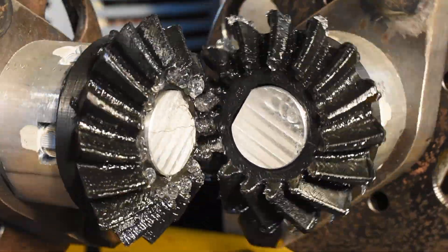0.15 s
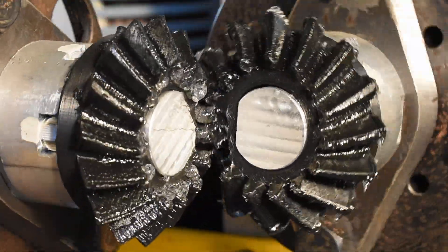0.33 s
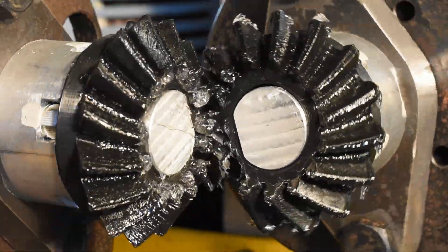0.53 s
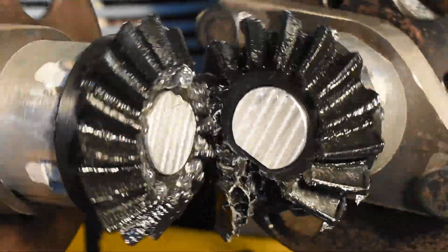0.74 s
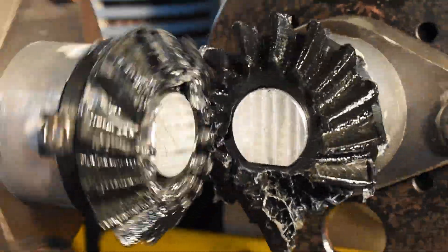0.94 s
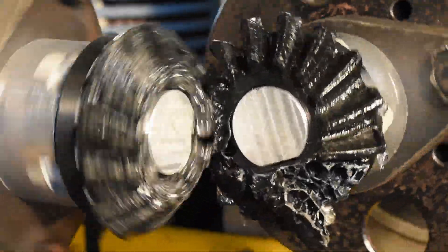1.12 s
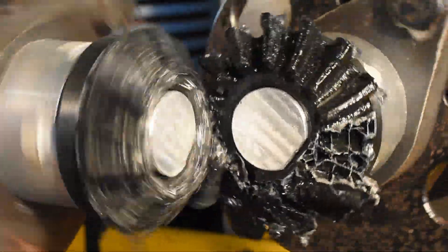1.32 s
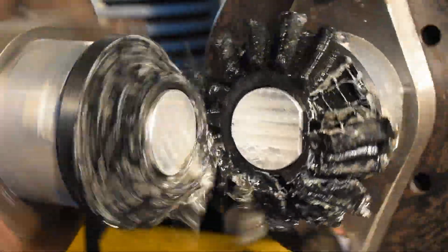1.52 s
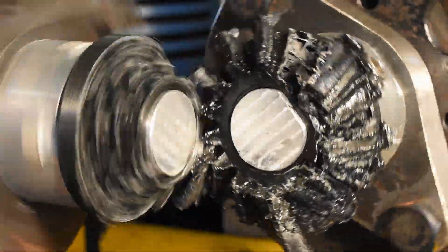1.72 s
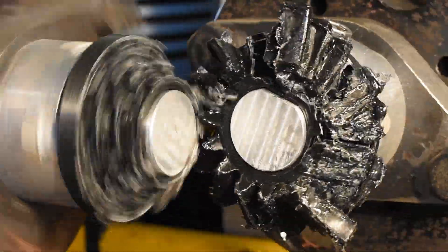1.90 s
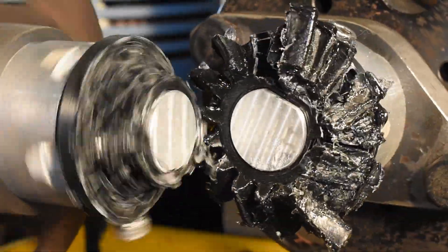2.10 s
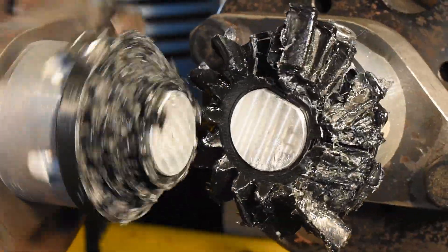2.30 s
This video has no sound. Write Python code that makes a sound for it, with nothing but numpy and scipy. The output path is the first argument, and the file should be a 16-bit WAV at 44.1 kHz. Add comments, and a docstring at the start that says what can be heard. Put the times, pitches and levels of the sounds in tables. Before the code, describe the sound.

Sharp cracking of plastic gears stripping their teeth, building to a crunching, rumbling grind.

```python
"""In a small workshop, two plastic bevel gears are driven against a load on a steel test rig.
Teeth crack one by one: each fracture excites the tooth and the gear body, and the shaft knocks back.
Stumps catch and jolt the rig, and hard pieces ping. The driving gear then spins through the stumps,
grinding and splintering them while the frame rumbles in its low modes, and runs on with a hum and
a light clatter. The room adds a short reverberation and a quiet background of air."""
import sys
import numpy as np
from scipy import signal
from scipy.fft import rfft, irfft, next_fast_len
from scipy.io import wavfile
from scipy.ndimage import uniform_filter1d

SR = 44100
rng = np.random.default_rng(int(sys.argv[2]) if len(sys.argv) > 2 else 0)


def wrap_up_sound(samples):
    """Save the sound to the file named by the first command line argument, as 16-bit audio."""
    columns = np.atleast_2d(samples).T
    # keep every value between -1 and 1, then stretch to whole-number steps
    tamed = np.clip(columns, -1, 1)
    steps = np.round(tamed * 32767).astype(np.int16)
    wavfile.write(sys.argv[1], SR, steps)


N = 103635
TIME = np.arange(N) / SR
BLOW_TIME = np.arange(SR // 5) / SR

# Levels are relative within each table column; each source applies its own gain.
# Tooth fractures: (time [s], snap level [dB], snap resonance [Hz], clack level [dB],
# clack resonance [Hz], shaft knock level [dB])
FRACTURES = [(0.218, -41, 8830.0, -55, 3100.0, -58), (0.2261, -33.5, 5900, -67, 3850.0, -58),
             (0.2439, -14, 10000, -30, 3220, -28), (0.2646, -15.5, 9200, -55, 3900, -36),
             (0.2736, -20, 9000, -53, 4330.0, -56), (0.2843, -21.5, 7300, -32.5, 4470, -39),
             (0.3643, -13, 5840, -26, 4130, -23.5), (0.5123, -42, 5500, -49.5, 4050, -44),
             (0.5801, -37.5, 8610.0, -54, 4070.0, -59), (0.5989, -11, 7600, -17, 4200, -24),
             (0.6796, -21.5, 5130, -23, 3600, -24), (0.6891, -31, 9150.0, -42, 4500, -31),
             (0.7007, -29.5, 6260, -45, 2840, -45), (0.7619, -17, 8170, -23.5, 3060, -26.5),
             (0.7897, -13, 10300, -28, 3900, -37), (0.7975, -27, 7100, -38, 4130.0, -35),
             (0.8066, -10.5, 7470, -27, 4300, -19), (0.852, -11.5, 8850, -16, 3360.0, -24),
             (0.9068, -12, 6520, -26, 4050.0, -25.5), (0.9597, -18, 8010.0, -25, 3300, -42),
             (0.9792, -22, 5600, -27, 4390.0, -22), (0.989, -18.5, 6720.0, -30.5, 3230.0, -54),
             (1.0063, -19.5, 6560, -22.5, 4420, -56), (1.0374, -20, 5100, -18.5, 2250, -18.5),
             (1.066, -26, 8400, -35, 2200, -26), (1.0732, -24, 8000, -46, 2350.0, -27),
             (1.089, -13.5, 8300, -28, 3270, -52), (1.109, -24, 8300, -44, 4180.0, -54),
             (1.1312, -26.5, 8700, -45, 4370.0, -52.5), (1.1446, -23.5, 7770.0, -52.5, 3940.0, -25.5),
             (1.1614, -13, 10500, -27, 4270, -20.5), (1.182, -18, 8300, -50, 3720, -28),
             (1.1939, -12.5, 5640, -20.5, 2390.0, -24.5), (1.2552, -21.5, 6090.0, -32, 3300, -23),
             (1.2758, -30, 9400, -29, 2360, -24), (1.2871, -16, 8000, -15, 4150, -37),
             (1.3151, -22, 9390.0, -27, 2980, -31), (1.3241, -16, 6600, -18, 3120.0, -27),
             (1.3659, -28.5, 8490, -32, 4270, -27), (1.43, -15.5, 8550.0, -24.5, 3000, -35),
             (1.4502, -26, 5250.0, -28, 4110.0, -28), (1.4595, -18, 6200, -29, 2710.0, -51),
             (1.4674, -17, 7860.0, -34, 2500, -48), (1.4788, -22.5, 8240, -26, 4050, -29.5),
             (1.5517, -27, 4600, -33, 3600.0, -29), (1.5697, -13.5, 5450, -15.5, 2560, -18.5),
             (1.5776, -19, 8150, -44, 2950, -41), (1.6055, -20.5, 9900, -24.5, 3450.0, -56),
             (1.635, -15, 9140, -19.5, 4400, -48), (1.6448, -23.5, 7600, -34, 4060, -24.5),
             (1.7288, -30, 5500, -38.5, 3900.0, -68), (1.7392, -31, 5170.0, -40, 3040.0, -54),
             (1.7656, -39, 7360.0, -32, 2460, -56), (1.7896, -32.5, 5620.0, -34.5, 3430, -29),
             (1.8, -20.5, 6500, -26, 4320, -35), (1.8451, -44, 9040.0, -43, 3500, -58),
             (1.8654, -33, 5150, -43, 4460.0, -32.5), (1.9139, -33, 5170, -43, 3340.0, -44),
             (1.9194, -34, 4900, -39.5, 3300, -50), (1.9749, -34, 5560, -35.5, 3320, -48),
             (2.0396, -35, 4900, -46, 3300, -49.5), (2.0812, -34, 7860.0, -34, 3700, -58),
             (2.1303, -37.5, 8240, -46, 3650, -78), (2.1368, -34, 6700, -42.5, 4460, -57),
             (2.24, -36.5, 7740, -45, 4140, -62)]
# Stumps catching: (time [s], level [dB], frequency [Hz], decay time constant [s])
STUMP_JOLTS = [(.247, -45, 339, 0.06), (0.373, -31.5, 392, 0.013), (.4, -33, 329, .012),
               (.519, -38, 700, 0.038), (.543, -42.5, 350, 0.017), (0.606, -36, 348, 0.026),
               (0.683, -20, 356, 0.021), (.706, -31, 223, 0.017), (.766, -29, 353, 0.013),
               (.858, -28.5, 361, 0.016), (1.05, -22, 691, 0.014), (1.068, -20, 364, 0.004),
               (1.26, -34, 340, 0.012), (1.325, -23, 650, 0.021), (1.409, -19.5, 233, 0.014),
               (1.412, -20.5, 557, 0.011), (1.549, -23, 348, 0.015), (1.675, -28, 637, 0.0097),
               (1.803, -26.5, 342, 0.012), (1.978, -26, 573, 0.013), (2.146, -38, 610, .01),
               (2.23, -37, 655, 0.0089), (2.318, -46, 630, 0.01)]
# Hard pieces ringing: (time [s], level [dB], frequency [Hz], 60 dB decay time [s])
PIECE_PINGS = [(.366, -52, 5330, 0.14), (.366, -43.5, 7200, 0.26), (2.085, -44, 7900, 0.082),
               (2.138, -51, 7000, .12), (2.277, -51, 7600, .11), (2.28, -51, 8300, 0.12)]
# Envelopes of the splintering, rumble, grinding and hum: (time [s], level [dB])
SPLINTER_LEVELS = [(.6, -55), (.63, -32), (.72, -45), (.8, -40), (.93, -29.5), (1.02, -48), (1.14, -32.5),
                   (1.23, -36), (1.4, -30.5), (1.47, -31.5), (1.53, -34), (1.585, -23), (1.65, -27.5),
                   (1.7, -50), (1.92, -53), (2.02, -46.5), (2.21, -56), (2.245, -41), (2.3, -52)]
RUMBLE_LEVELS = [(.69, -30.5), (.78, -31.5), (.93, -39.5), (.99, -28.5), (1.075, -28), (1.12, -48),
                 (1.22, -24), (1.3, -25), (1.425, -25.5), (1.48, -29.5), (1.62, -23.5), (1.77, -49),
                 (1.81, -31), (1.95, -48), (2.01, -35), (2.11, -48), (2.35, -42)]
GRIND_LEVELS = [(.69, -37.5), (.78, -43.5), (.93, -43), (.99, -37.5), (1.06, -34), (1.12, -46), (1.18, -36),
                (1.3, -46), (1.37, -34.5), (1.435, -25), (1.5, -37), (1.55, -51), (1.6, -29.5), (1.7, -66),
                (1.755, -55), (1.77, -40), (1.82, -44.5), (1.9, -68), (2.35, -81)]
HUM_LEVELS = [(1.65, -55), (1.75, -41), (1.95, -38), (2.04, -39), (2.13, -51), (2.26, -44.5), (2.35, -47)]
# Spectral envelopes of the noises and the room's response: (frequency [Hz], level [dB])
AIR_SPECTRUM = [(25, -8), (150, 1), (350, 2), (700, -4), (1300, -5), (2200, -9), (3500, -14), (7000, -20.5),
                (12000, -27), (16000, -32)]
ROOM_SPECTRUM = [(100, -1), (350, -2), (700, -5.5), (1200, -6), (3000, -9.5), (6000, -11), (10000, -9.5),
                 (15000, -19.5)]
SPLINTER_SPECTRUM = [(1000, -23), (2500, 0.5), (4500, 4), (6000, 7), (9000, -2.5), (11000, 1.5),
                     (12500, -11.5), (15000, -1), (16500, -46)]
RUMBLE_SPECTRUM = [(25, -89), (60, -74), (110, -15.5), (170, -2), (240, -1), (295, 4), (345, 9.5),
                   (410, -6), (540, 4), (800, -22), (1300, -60)]
GRIND_SPECTRUM = [(250, -18), (450, 6.5), (700, 6), (850, 3), (1050, -4.5), (1700, -4.5), (2600, -10),
                  (4500, -29), (9000, -30)]
# Normal modes of the steel frame: (frequency [Hz], level [dB], 60 dB decay time [s])
FRAME_MODES = [(76, -18, 0.24), (176, -15, 0.68), (213.6, -10.5, 0.36), (242.4, -4, 0.52),
               (353.7, 2.5, 0.35), (450.7, -11, 0.37), (590.5, -9.5, 0.39), (681, -14, 0.34),
               (779.4, -13, .35)]
# Partials of the free-running rig: (frequency [Hz], level [dB])
HUM_PARTIALS = [(174, -9), (246, 1.5)]

SLIP_START_S, SLIP_RISE_S, RUBS_PER_S = 0.675, 0.012, 500


def from_db(db):
    """Amplitude ratio of a level in decibels."""
    return 10 ** (np.asarray(db) / 20)


def unit_rms(x, size=None):
    """Normalisation: the first size samples (all by default) get rms 1."""
    return x / np.sqrt(np.mean(x[:size] ** 2) + 1e-20)


def envelope(rows):
    """Amplitude envelope through (time [s], level [dB]) points."""
    return from_db(np.interp(TIME, *np.transpose(rows)))


def band(x, low_hz, high_hz, order=2):
    """Causal band-pass filtering."""
    sections = signal.butter(order, [low_hz, high_hz], "band", fs=SR, output="sos")
    return signal.sosfilt(sections, x + 1e-18)


def colour(x, points):
    """Spectral shaping by (frequency [Hz], level [dB]) points."""
    hz, db = np.transpose(points)
    size = next_fast_len(len(x) + 4096)
    bin_hz = np.arange(size // 2 + 1) * SR / size
    gain = from_db(np.interp(np.log(bin_hz + 1), np.log(hz), db))
    return irfft(rfft(x, size) * gain, size)[:len(x)]


def resonate(x, hz, width_hz):
    """Forced response of a damped resonator with unit peak gain."""
    r = np.exp(-np.pi * width_hz / SR)
    feedback = [1, -2 * r * np.cos(2 * np.pi * hz / SR), r * r]
    return signal.lfilter(np.array([1, 0, -1]) * (1 - r * r) / 2, feedback, x + 1e-18)


def add(out, start_s, sound):
    """Superposition of a sound from start_s onward."""
    i = int(start_s * SR)
    out[i:i + len(sound)] += sound[:N - i]


def grains(per_s, spread_db, decay_s):
    """A Poisson process of decaying noise bursts, unequal in size, whose powers add."""
    sizes = from_db(spread_db * np.minimum(rng.exponential(1, N), 4))
    onsets = rng.random(N) < per_s / SR
    power = signal.lfilter([1], [1, -np.exp(-2 / (decay_s * SR))], onsets * sizes ** 2 + 1e-18)
    return np.sqrt(power) * rng.standard_normal(N)


def swing(hz, sag, rise_s, decay_s):
    """A damped oscillation that starts the fraction sag above hz and settles toward it."""
    decay = np.exp(-BLOW_TIME / decay_s)
    rise = 1 - np.exp(-(BLOW_TIME / rise_s) ** 2)
    phase = 2 * np.pi * np.cumsum(hz * (1 + sag * decay)) / SR
    return unit_rms(np.sin(phase) * rise * decay, size=441)


def room_air():
    """Stationary broadband noise, strongest at low frequencies, forms the quiet background."""
    return from_db(-55.5) * unit_rms(colour(rng.standard_normal(N), AIR_SPECTRUM))


def tooth_fractures(attack_s=0.0001, hold_s=0.0014, decay_s=0.0014, thud_decay_s=0.003):
    """Impulsive excitation: each fracture rings the tooth and gear body, then the shaft recoils."""
    knock_hz, knock_delay_s = 664.3, 0.004536
    out, t = np.zeros(N), BLOW_TIME[:SR // 40]
    burst = np.minimum(t / attack_s, 1) * np.exp(-np.maximum(t - hold_s, 0) / decay_s)
    for start_s, snap_db, snap_hz, clack_db, clack_hz, knock_db in FRACTURES:
        tear, flex, release = rng.standard_normal((3, len(t)))
        snap = band(tear * burst, low_hz=4700, high_hz=12530)
        snap += 2.24 * resonate(snap, snap_hz, width_hz=1200)
        clack = band(flex * burst, low_hz=2300, high_hz=4900)
        clack += 2.2 * resonate(clack, clack_hz, width_hz=480)
        thud = band(release * np.exp(-t / thud_decay_s), low_hz=185, high_hz=1620)
        thud_db = (clack_db + knock_db) / 2 - 3.5
        for sound, db in (snap, snap_db + 1), (clack, clack_db - 0.5), (thud, thud_db):
            add(out, start_s, from_db(db) * unit_rms(sound, size=180))
        detune = 1 + 0.07 * rng.standard_normal()
        knock = swing(knock_hz * detune, sag=0.16, rise_s=0.0021, decay_s=0.0049)
        add(out, start_s + knock_delay_s, from_db(knock_db) * knock)
    return out


def reverberation(x, low_t60_s=0.48, treble_t60_s=0.2, crossover_hz=4000, build_s=0.0032):
    """The workshop's diffuse field decays exponentially, the treble fastest."""
    t = np.arange(SR // 2) / SR
    noise = rng.standard_normal(len(t))
    lows = signal.sosfiltfilt(signal.butter(1, crossover_hz, fs=SR, output="sos"), noise)
    tail = lows * from_db(-60 * t / low_t60_s) + (noise - lows) * from_db(-60 * t / treble_t60_s)
    spectrum = rfft(tail, 4 * len(t))
    tail = irfft(spectrum / np.sqrt(np.abs(spectrum) + 1e-9))[:len(t)]  # evens out peaks and holes
    tail = colour(tail / np.sqrt(np.sum(tail ** 2)), ROOM_SPECTRUM)
    build_up = np.minimum(t / build_s, 1) ** 2
    return signal.fftconvolve(x, tail * build_up)[:N]


def stump_jolts():
    """Stumps catch and let go, exciting a heavily damped vibration roughened by an octave of noise."""
    out = np.zeros(N)
    for start_s, db, hz, decay_s in STUMP_JOLTS:
        burst = rng.standard_normal(len(BLOW_TIME)) * np.exp(-BLOW_TIME / decay_s)
        judder = unit_rms(band(burst, hz * 0.71, hz * 1.403, order=3), size=441)
        blow = swing(hz, sag=0.034, rise_s=0.00079, decay_s=decay_s) + 0.98 * judder
        add(out, start_s, from_db(db - 3.5) * unit_rms(blow, size=441))
    return out


def piece_pings(half_width_hz=200):
    """Free vibration of small hard pieces: close partials merge into a decaying narrow band."""
    out = np.zeros(N)
    for start_s, db, hz, t60_s in PIECE_PINGS:
        ring = band(rng.standard_normal(len(BLOW_TIME)), hz - half_width_hz, hz + half_width_hz)
        ring *= from_db(-60 * BLOW_TIME / t60_s)
        add(out, start_s, from_db(db) * unit_rms(ring, size=882))
    return out


def splintering():
    """Many tiny fractures in the stumps superpose into a bright crackle."""
    splinters = colour(grains(per_s=440, spread_db=3, decay_s=0.0024), SPLINTER_SPECTRUM)
    started = TIME > SPLINTER_LEVELS[0][0]
    return started * envelope(SPLINTER_LEVELS) * from_db(-1) * unit_rms(splinters)


def slipping_mesh():
    """Friction noise: the spinning gear rumbles over the stumps and grinds their crumbs."""
    slipping = np.clip((TIME - SLIP_START_S) / SLIP_RISE_S, 0, 1)
    rubs = colour(grains(RUBS_PER_S, spread_db=1.5, decay_s=0.003), RUMBLE_SPECTRUM)
    crumbs = colour(grains(per_s=1300, spread_db=2.5, decay_s=0.0011), GRIND_SPECTRUM)
    rumble = from_db(-8) * envelope(RUMBLE_LEVELS) * unit_rms(rubs)
    grind = from_db(3.5) * envelope(GRIND_LEVELS) * unit_rms(crumbs)
    return slipping * (rumble + grind)


def frame_ringing():
    """Forced vibration: the rubbing drives the low normal modes of the steel frame, which ring on."""
    drive = envelope(RUMBLE_LEVELS)
    shaking = (TIME > SLIP_START_S) * drive * grains(RUBS_PER_S, spread_db=1, decay_s=0.0023)
    modes = sum(from_db(db) * unit_rms(resonate(shaking, hz, width_hz=np.log(1000) / np.pi / t60_s))
                for hz, db, t60_s in FRAME_MODES)
    return from_db(-3) * np.sqrt(np.mean(drive ** 2)) * unit_rms(modes)


def rig_hum(line_width_hz=6.1):
    """The free-running rig drones on two partials, each broadened by a random walk in phase."""
    partials = np.zeros(N)
    for hz, db in HUM_PARTIALS:
        wander = np.cumsum(rng.standard_normal(N)) * np.sqrt(2 * np.pi * line_width_hz / SR)
        partials += from_db(db) * np.sin(2 * np.pi * hz * TIME + uniform_filter1d(wander, size=900))
    return (TIME > HUM_LEVELS[0][0]) * envelope(HUM_LEVELS) * unit_rms(partials)


def scene():
    """Superposition of the gears' direct and reverberant sound with the frame, hum and air."""
    gears = tooth_fractures() + stump_jolts() + piece_pings() + splintering() + slipping_mesh()
    return (room_air() + gears + reverberation(gears) + frame_ringing() + rig_hum())[None]


def record(dry):
    """Soft saturation rounds the loudest snaps; a low-pass filter removes the highest treble."""
    ceiling, stopband_hz = 0.68, 17100
    rounded = dry / (1 + (dry / ceiling) ** 4) ** (1 / 4)
    return signal.sosfilt(signal.cheby2(16, 70, stopband_hz, fs=SR, output="sos"), rounded)


dry = scene()
out = record(dry)
wrap_up_sound(out)
```